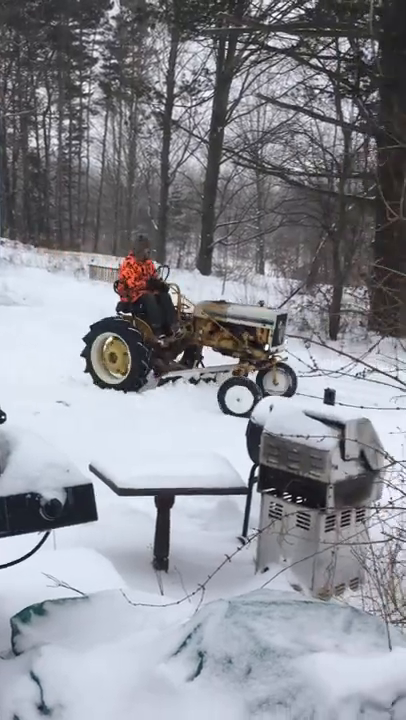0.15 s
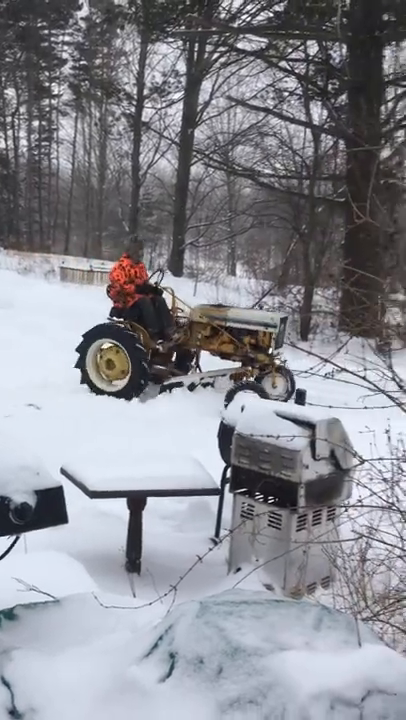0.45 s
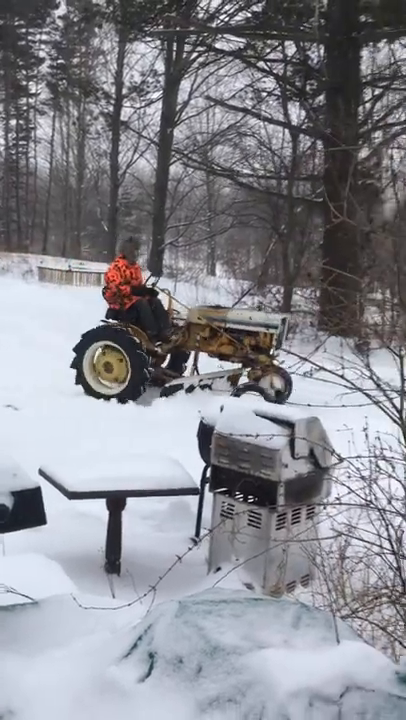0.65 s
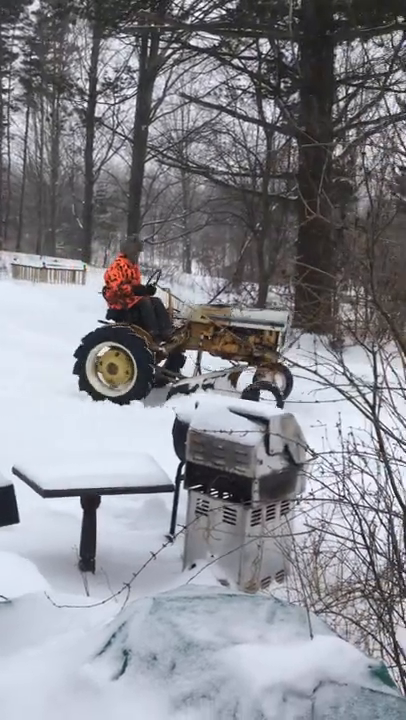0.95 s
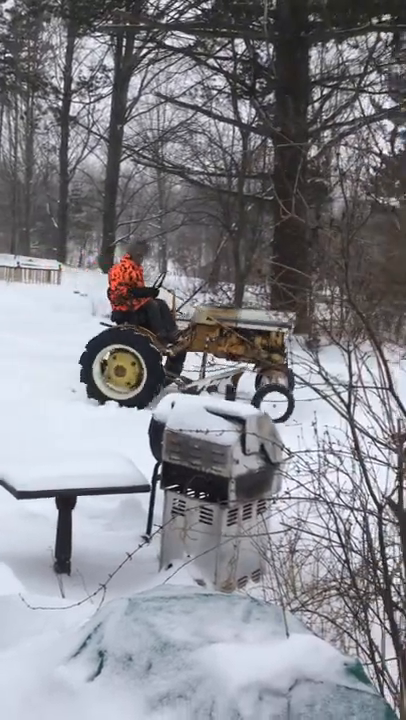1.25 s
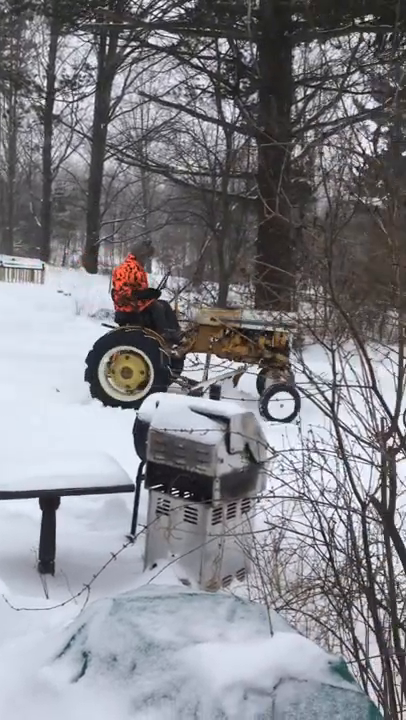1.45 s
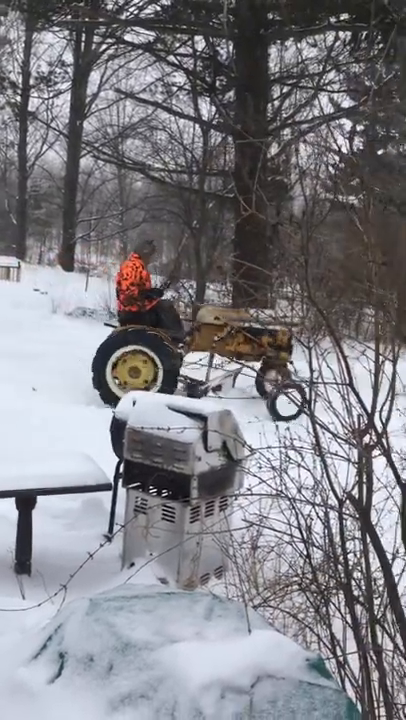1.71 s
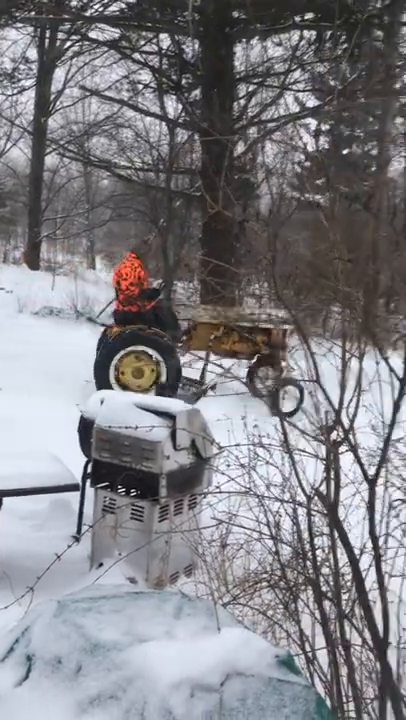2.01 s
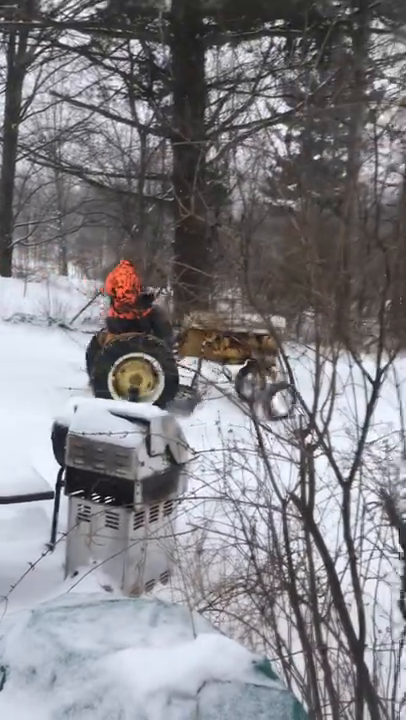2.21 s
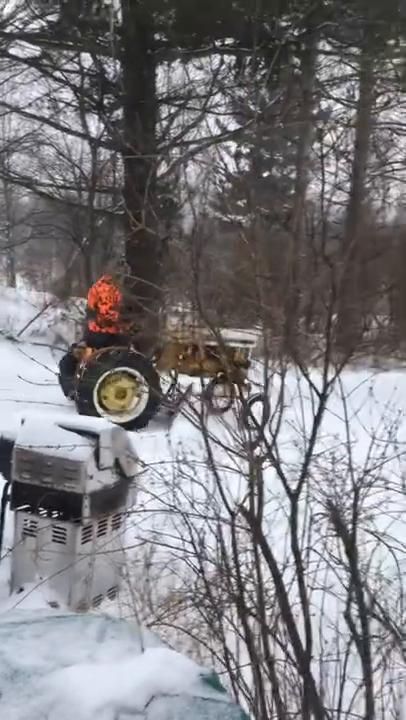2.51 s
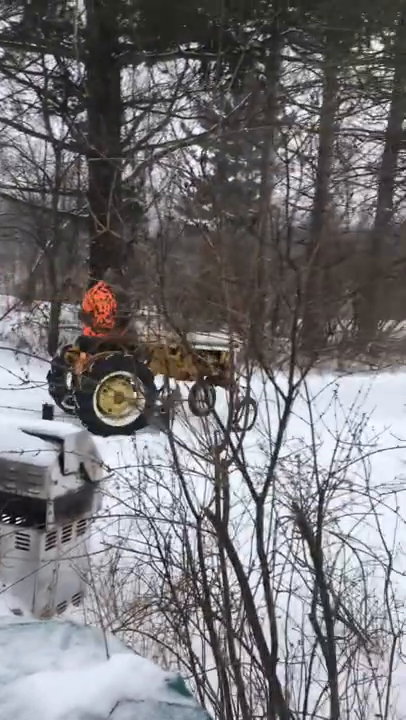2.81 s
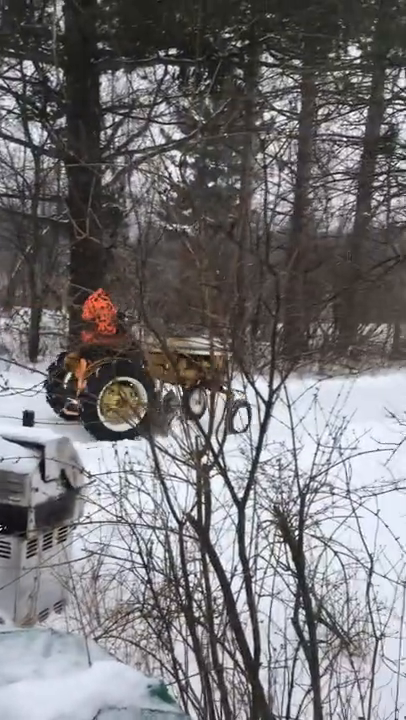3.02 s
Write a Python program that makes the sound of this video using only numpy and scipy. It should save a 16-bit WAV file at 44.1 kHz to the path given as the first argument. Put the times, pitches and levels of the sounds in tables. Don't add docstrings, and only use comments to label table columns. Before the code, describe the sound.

Low, constant tractor engine hum with fan buzz and thin panel hiss in an open snowy yard; scattered tinny rattles early, faint gear whine midway, quick squeaky chirps last, heard from a distant phone microphone.

```python
import sys
import numpy as np
from scipy import signal
from scipy.fft import rfft, irfft
from scipy.io import wavfile
from scipy.ndimage import uniform_filter1d

SR = 44100
rng = np.random.default_rng(int(sys.argv[2]) if len(sys.argv) > 2 else 0)


def gain_from_db(level_db):
    decades = np.asarray(level_db, float) / 20
    return 10 ** decades


def store_wav(level_fs):
    pcm = np.round(np.clip(np.atleast_2d(level_fs), -1, 1) * 32767)
    wavfile.write(sys.argv[1], SR, pcm.T.astype(np.int16))


N = 139356
T = np.arange(N) / SR

# time_s, heading (0 side-on, 1 quartering, 2 from behind)
HEADING = [
    (0, 0.022),
    (.5, 0.016),
    (1.05, 0.35),
    (1.3, 0.85),
    (1.8, 1.12),
    (2.34, 1.21),
    (2.42, 1.3),
    (2.85, 1.45),
    (3.16, 1.45),
]


def evened(x):
    return x / np.sqrt(np.mean(x ** 2) + 1e-20)


def along(points):
    return np.interp(T, *np.transpose(points))


def facing(dbs):
    return gain_from_db(np.interp(along(HEADING), np.arange(3), dbs))


def drift(seconds):
    size = max(int(seconds * SR), 2)
    smooth = uniform_filter1d(rng.standard_normal(N), size)
    return evened(uniform_filter1d(smooth, size))


def swell(start, length):
    arch = np.sin(np.pi * np.clip((T - start) / length, 0, 1))
    return np.sqrt(arch + 1e-9) * (T > start) * (T < start + length)


def wandering_tone(hz):
    return np.sin(2 * np.pi * np.cumsum(hz) / SR)


def coloured(points, lump_db=0):
    lump_hz = 220
    hz = np.fft.rfftfreq(N, 1 / SR)
    f, db = np.transpose(points)
    lumps = lump_db * drift(lump_hz * N / SR ** 2)[:len(hz)]
    gain = gain_from_db(np.interp(np.log(hz + 1), np.log(f), db) + lumps)
    return evened(irfft(rfft(rng.standard_normal(N)) * gain, N))


def ringing(modes, shared, own_db):
    surge_s = 0.024
    hz = np.fft.rfftfreq(N, 1 / SR)
    out = np.zeros(N)
    for f, width, *dbs in modes:
        shape = 1 / (1 + ((hz - f) / width) ** 2) ** 2
        ring = evened(irfft(rfft(rng.standard_normal(N)) * shape, N))
        out += facing(dbs) * gain_from_db(own_db * drift(surge_s)) * ring
    return out * shared


def yard_air():
    # freq_hz, level_db
    air_colour = [(18, -15), (30, -12), (127, 10), (189, -39), (295, 10), (760, -24), (937, -37),
                  (1540, 11), (16000, -55)]
    return gain_from_db(-66.5) * coloured(air_colour)


def rattles():
    # start_s, peak_db, length_s, brightness_db
    ruts = [(0.028, -40.5, 0.022, -27), (0.078, -45, 0.021, -19), (0.122, -40, 0.022, -20),
            (0.275, -38.5, 0.02, -20), (0.33, -49, 0.019, -28), (0.47, -50, 0.026, -19),
            (0.516, -44, 0.018, -17), (0.538, -46, 0.015, -24), (0.622, -48, 0.027, -25),
            (0.781, -42, 0.03, -16), (0.868, -43.5, 0.02, -21), (0.9594, -54, 0.023, -15),
            (1.02, -54, 0.015, -10), (1.274, -50, 0.029, -13), (1.326, -44, 0.017, -11),
            (1.376, -49, 0.031, -13), (1.5294, -50, 0.025, -15), (1.769, -48, 0.02, -18),
            (1.799, -45.5, 0.018, -18), (1.97, -53, 0.023, -19), (2.03, -46, 0.018, -19),
            (2.13, -49, 0.016, -28), (2.282, -42, 0.016, -17), (2.34, -50.5, 0.061, -27),
            (2.794, -48, 0.016, -19), (2.841, -47.5, 0.021, -23), (3.037, -52, 0.023, -23)]
    # freq_hz, level_db
    dull_colour = [(1500, -34), (3300, 2.5), (4000, -1), (5300, -3), (5900, 0), (6500, -7.5), (8500, -9.5),
                   (10500, -23)]
    bright_colour = [(3000, -40), (7500, -8), (9800, 0), (11500, -12), (16000, -26)]
    level_db, sheen_db, lump_db = -10, 5, 4
    rise_s, hold = 0.006, 1.15
    chatter_db, chatter_s = 2.5, 0.002
    dull, bright = np.zeros((2, N))
    for start, db, length, bright_db in ruts:
        u = np.maximum(T - start, 0)
        fade = np.exp(-(u / length / hold) ** 2)
        env = gain_from_db(db + level_db) * np.minimum(u / rise_s, 1) * fade
        dull += env * gain_from_db(0.91 * drift(0.0014))
        bright += env * gain_from_db(bright_db + sheen_db)
    tin = dull * coloured(dull_colour, lump_db) + bright * coloured(bright_colour, lump_db)
    return gain_from_db(chatter_db * drift(chatter_s)) * tin


def pings():
    # start_s, length_s, pitch_hz, level_db
    knocks = [(2.305, .055, 2210, -59), (2.368, .04, 2260, -56), (2.54, 0.063, 2250, -60),
              (2.612, .03, 2240, -64), (2.64, 0.032, 2240, -57), (2.76, 0.042, 2210, -61),
              (2.885, .04, 2240, -65), (3.115, .04, 2220, -64), (0.01, .04, 6500, -59),
              (.115, 0.041, 6550, -61), (.465, 0.039, 6500, -66), (.515, 0.06, 6500, -65),
              (0.608, 0.042, 6450, -61), (.775, .045, 6500, -62), (.865, .035, 6500, -69)]
    wander, wander_s = 0.012, 0.002
    out = np.zeros(N)
    for start, length, hz, db in knocks:
        pitch = hz * (1 + wander * hz / 6500 * drift(wander_s))
        out += np.sqrt(2) * gain_from_db(db) * swell(start, length) * wandering_tone(pitch)
    return out


def chirps():
    # start_s, level_db
    strokes = [(2.575, -54), (2.63, -44), (2.69, -48), (2.73, -46), (2.78, -45), (2.838, -40), (2.88, -53),
               (2.935, -41), (2.988, -46), (3.036, -37), (3.082, -50), (3.113, -42), (3.135, -43)]
    bracket_modes = [1580, 1480, 1780]
    length_s = 0.038
    env = sum(gain_from_db(db) * swell(start, length_s) ** 2 for start, db in strokes)
    ring = np.zeros(N)
    for k, hz in enumerate(bracket_modes):
        ring += gain_from_db(-7 * k + 0.6 * drift(0.011)) * wandering_tone(hz + 18 * drift(0.0223))
    return env * ring


def gears(turns):
    mesh_orders = [43.1, 43.1, 86.2, 107.9, 107.9, 115.5, 90.3, 107.9, 74, 86.2, 86.2]
    # start_s, length_s, level_db
    whines = [(1.68, .5, -53), (2.55, .65, -61), (2.62, .25, -61), (2.6, .165, -58), (2.33, .3, -66),
              (2.13, .04, -59), (.36, .4, -66), (.75, .65, -67), (.75, .6, -66), (2.87, .13, -64),
              (3.1, .09, -60)]
    waver_db, slip = 1.7, 0.09
    out = np.zeros(N)
    for order, (start, length, db) in zip(mesh_orders, whines):
        level = np.sqrt(2) * gain_from_db(db + waver_db * drift(0.024)) * swell(start, length)
        out += level * np.sin(2 * np.pi * (order * turns + slip * drift(0.053)))
    return out


def sheet():
    # pitch_hz, width_hz, side_db, quartering_db, behind_db
    panel_modes = [(323.3, 9.96, -53, -53.5, -58), (711.3, 11.05, -56, -57.5, -67),
                   (621.4, 9.7, -56, -66, -48), (806.5, 9.88, -62, -61, -70), (589, 12.7, -51, -61, -58),
                   (531.3, 13.87, -54.5, -47, -83), (764, 13.87, -51.5, -62, -78),
                   (1582, 27.3, -56, -58, -60), (1851, 17.5, -68.5, -63.5, -55),
                   (2155, 8.4, -67, -65.5, -80), (4364, 98, -69, -72.5, -61),
                   (5200, 370, -66.5, -72.5, -80), (6540, 180, -74, -73.5, -85),
                   (8420, 240, -75, -80.5, -78), (9820, 150, -82, -80, -96), (10900, 200, -86, -94, -95)]
    strands = 10
    surge_db, wander_s, flare_db = 1.3, 0.035, 1.8
    out = np.zeros(N)
    for hz, width, *dbs in panel_modes[:strands]:
        level = np.sqrt(2) * facing(dbs) * gain_from_db(surge_db * drift(0.017))
        out += level * wandering_tone(hz + width * drift(wander_s))
    return out + ringing(panel_modes[strands:], 0.87, flare_db)


def hood():
    # pitch_hz, width_hz, side_db, quartering_db, behind_db
    hood_modes = [(2690, 520, -65, -65.5, -60.5), (3258, 300, -60.5, -65, -62), (3490, 240, -72, -65, -64),
                  (4150, 1700, -60.5, -64, -54), (4870, 580, -72, -69, -67.5), (5440, 500, -67, -67, -65),
                  (6430, 770, -67.5, -70, -69), (7560, 540, -75.5, -76, -80), (8640, 1500, -74.5, -73, -77),
                  (9630, 2300, -78, -79.5, -70), (12000, 3600, -78, -76, -94), (14800, 2600, -80, -79, -81)]
    return ringing(hood_modes, gain_from_db(0.4 * drift(0.012)), 1.27)


def block(turns):
    # pitch_hz, width_hz, side_db, quartering_db, behind_db
    block_modes = [(85, 43, -52.5, -50, -58), (155, 64, -50, -52, -55), (244, 40, -58.5, -45.5, -44.5),
                   (315.7, 85, -47.5, -45.5, -51), (463, 66, -60, -46.5, -66),
                   (556, 87, -46.5, -50.5, -54.5), (732, 163, -52.5, -49, -51.5), (854, 23, -63, -62, -58),
                   (1075, 200, -56.5, -56.5, -62.5), (1325, 183, -56, -55.5, -55),
                   (1471, 110, -59.5, -61, -48), (1560, 106, -56, -58, -60), (1750, 550, -55, -57, -45.5),
                   (2240, 90, -63.5, -63.5, -78)]
    surge_db = 1.28
    throb_per_s, throb_start_s = 19.8, 2.955
    chug = 1 + 0.016 * (np.cos(2 * np.pi * turns) + 1.2 * np.cos(np.pi * turns))
    depth = 0.3 * np.clip(along(HEADING) - 0.5, 0, 1)
    throb = 1 + depth * np.cos(2 * np.pi * throb_per_s * (T - throb_start_s))
    low = ringing(block_modes[:9], chug, surge_db)
    return low + ringing(block_modes[9:], chug * throb, surge_db)


def fan(turns):
    # side_db, quartering_db, behind_db
    blade_levels = [(-45.5, -40.5, -45.5), (-46.5, -48.5, -55), (-54.5, -52.5, -64.5), (-57, -66, -60)]
    blade = 4.775 * turns + 0.56
    skew = 0.53
    out = np.zeros(N)
    for k, dbs in enumerate(blade_levels):
        level = np.sqrt(2) * facing(dbs) * gain_from_db(0.8 * drift(0.083))
        out += level * np.cos(2 * np.pi * ((k + 1) * blade + k * skew))
    return out


def exhaust(turns):
    pulse_orders = [1.5, 2, 3, 4, 5, 6, 7, 7.5, 8, 8.5, 9, 10, 11]
    # side_db, quartering_db, behind_db
    pulse_levels = [(-66, -58, -68), (-34, -33.5, -41.5), (-49, -52, -50), (-33.5, -31, -32.5),
                    (-61, -54, -52), (-55, -49, -45.5), (-67, -67, -36), (-55.5, -48.5, -65),
                    (-69, -73, -39), (-67, -65, -45), (-61, -47, -48.5), (-56.5, -48.5, -48.5),
                    (-56.5, -73, -72)]
    rear_lead = [(0, -.01), (1.2, -.03), (1.3, .01), (1.57, .045)]
    waver_db, lag = 0.3, 0.045
    lead = np.interp(along(HEADING), *np.transpose(rear_lead))
    out = np.zeros(N)
    for k, dbs in zip(pulse_orders, pulse_levels):
        shift = {2: lead, 4: 0, 6: -lag}.get(k, rng.random())
        level = np.sqrt(2) * facing(dbs) * gain_from_db(waver_db * np.sqrt(k / 4) * drift(0.08))
        out -= level * np.cos(2 * np.pi * k * (turns + shift))
    return out


def crank():
    # time_s, speed_turns_per_s
    crank_speed = [(0.0, 29.939), (0.25, 30.126), (0.5, 30.317), (0.75, 30.325), (0.95, 30.322),
                   (1.1, 29.603), (1.3, 29.989), (1.5, 30.127), (1.75, 29.788), (2.0, 29.794),
                   (2.2, 29.626), (2.3, 29.893), (2.4, 30.227), (2.5, 30.217), (2.75, 30.133),
                   (3.16, 30.341)]
    return np.cumsum(along(crank_speed)) / SR - 0.135


def snow(x):
    # pitch_hz, width_hz, depth_0_to_1
    echo_dips = [(407, 11.4, 0.32), (664, 17.4, 0.34), (941, 37, 0.43), (2106, 59, 0.54)]
    hz = np.fft.rfftfreq(N, 1 / SR)
    gain = np.ones(len(hz))
    for f, width, depth in echo_dips:
        gain *= 1 - np.clip(depth, 0, 1) * np.exp(-((hz - f) / width) ** 2)
    return irfft(rfft(x) * gain, N)


def scene():
    turns = crank()
    loose = rattles() + pings() + chirps()
    shell = snow(sheet() + hood() + block(turns))
    engine = gears(turns) + fan(turns) + exhaust(turns)
    return (yard_air() + loose + shell + engine)[None]


def roll_off(x):
    return signal.sosfilt(signal.butter(12, 16470, fs=SR, output="sos"), x)


def record(dry):
    bass_cut = signal.butter(3, 46, "high", fs=SR, output="sos")
    heard = signal.sosfiltfilt(bass_cut, dry)
    band_limit = signal.firwin(1023, 15790, window=("kaiser", 9), fs=SR)
    heard = signal.oaconvolve(heard, band_limit[None], "same")
    return roll_off(heard)


dry = scene()
out = record(dry)
store_wav(out)
```